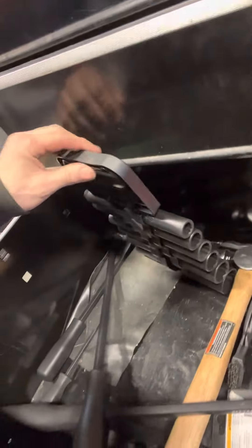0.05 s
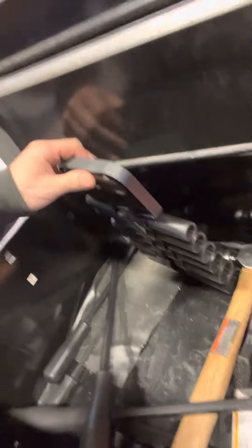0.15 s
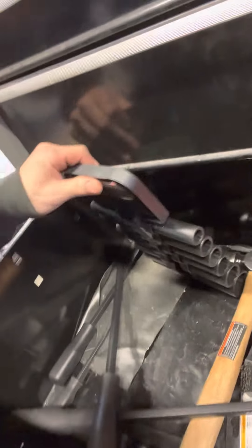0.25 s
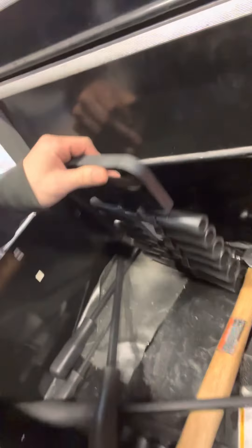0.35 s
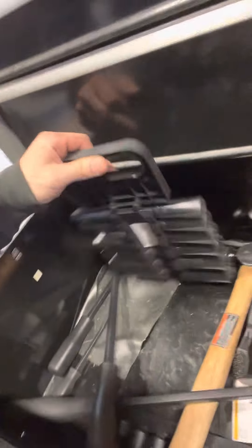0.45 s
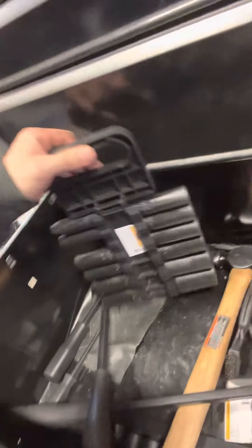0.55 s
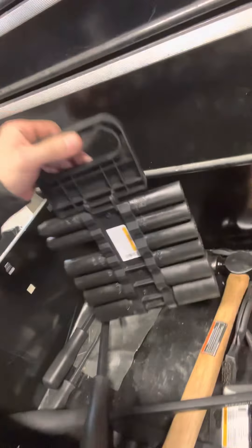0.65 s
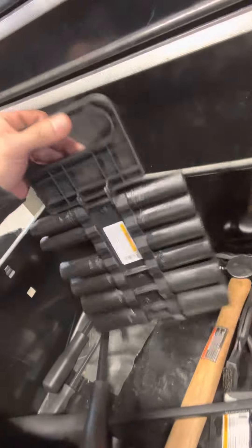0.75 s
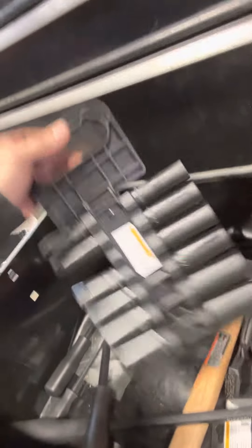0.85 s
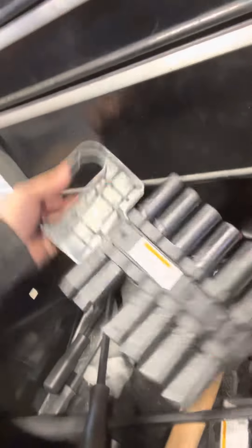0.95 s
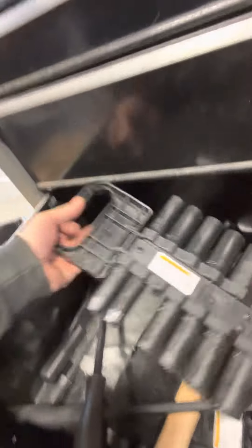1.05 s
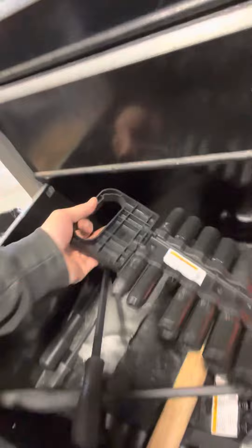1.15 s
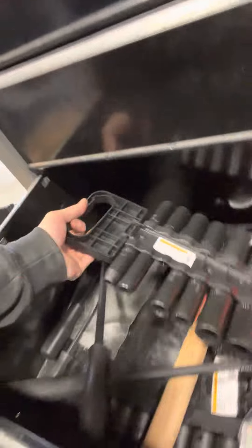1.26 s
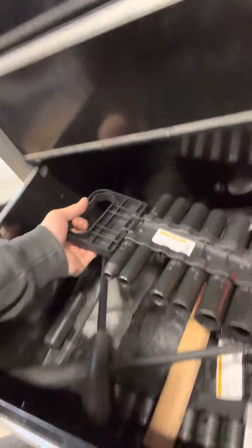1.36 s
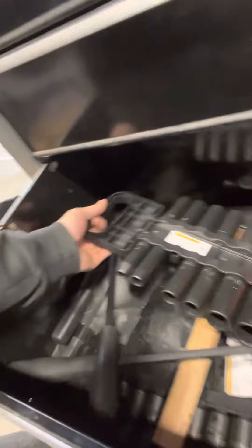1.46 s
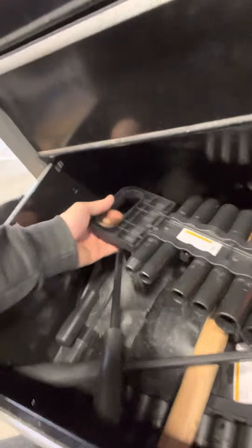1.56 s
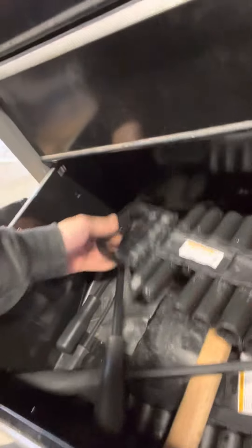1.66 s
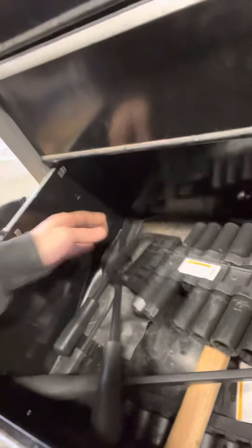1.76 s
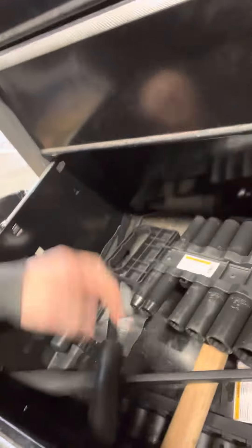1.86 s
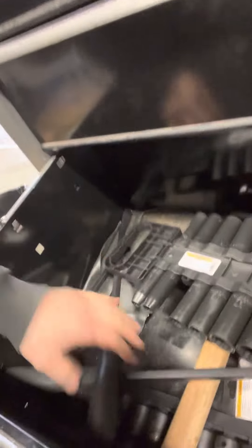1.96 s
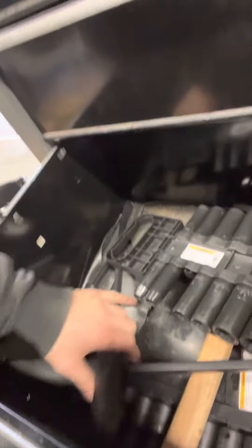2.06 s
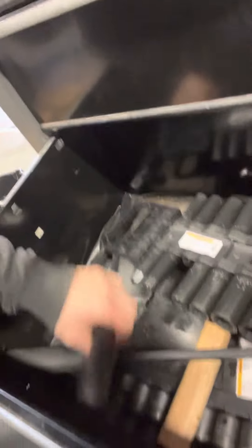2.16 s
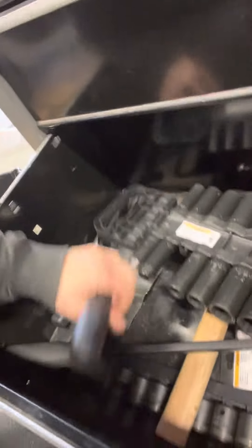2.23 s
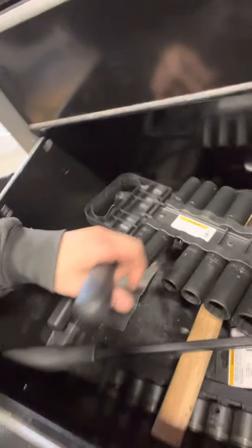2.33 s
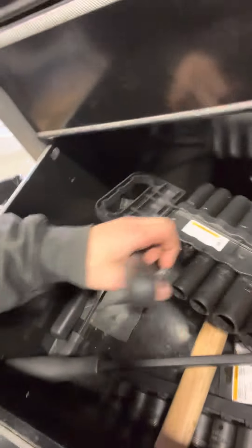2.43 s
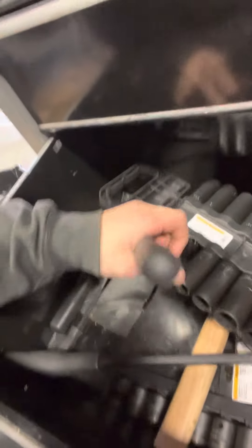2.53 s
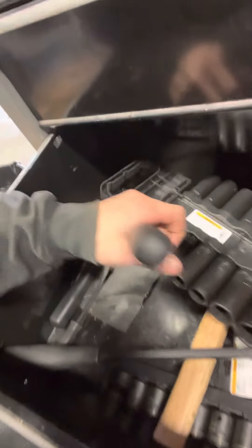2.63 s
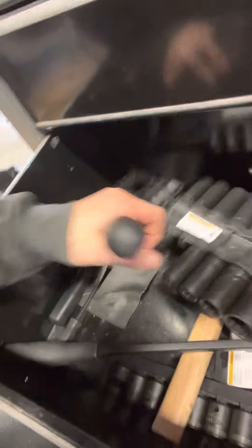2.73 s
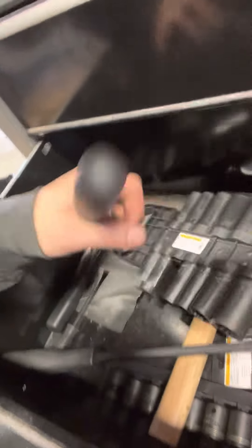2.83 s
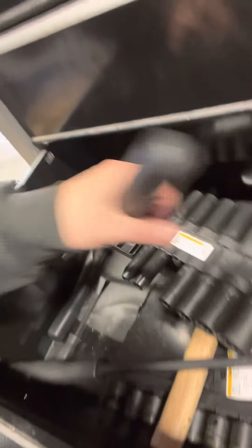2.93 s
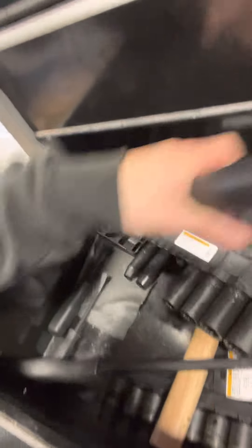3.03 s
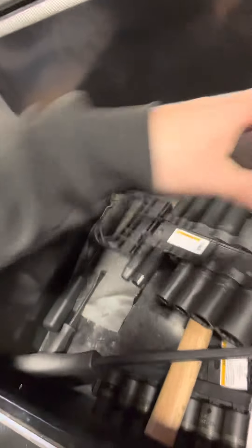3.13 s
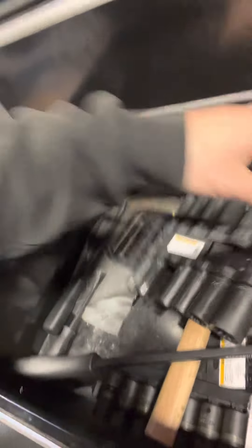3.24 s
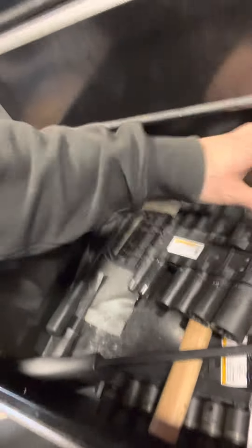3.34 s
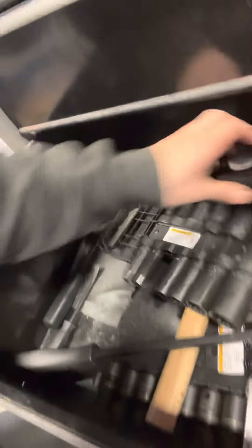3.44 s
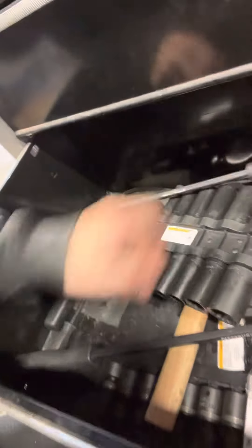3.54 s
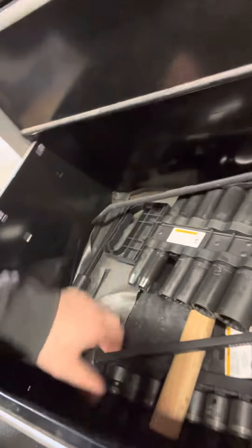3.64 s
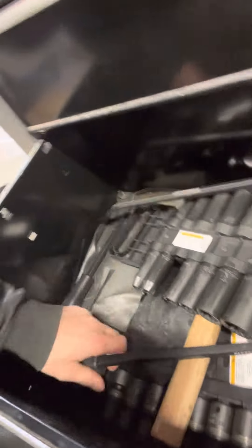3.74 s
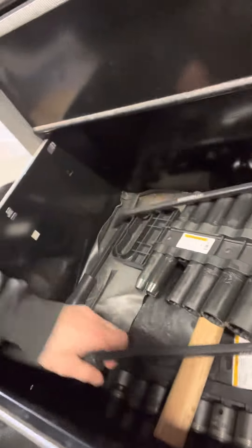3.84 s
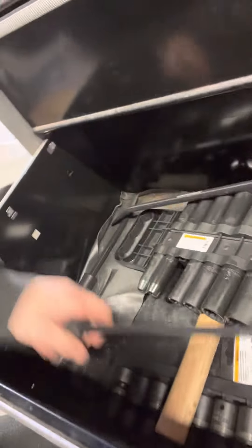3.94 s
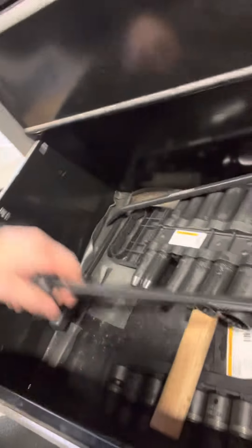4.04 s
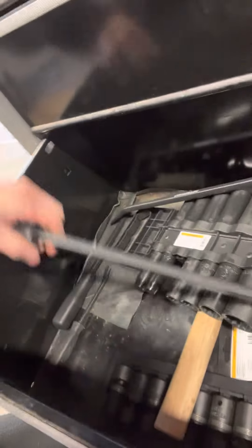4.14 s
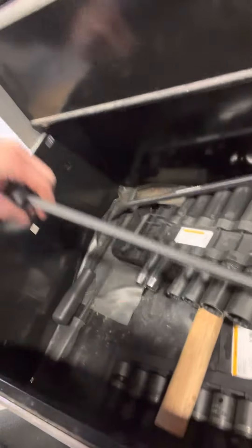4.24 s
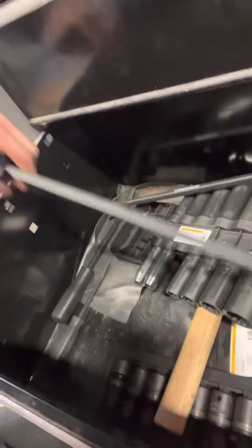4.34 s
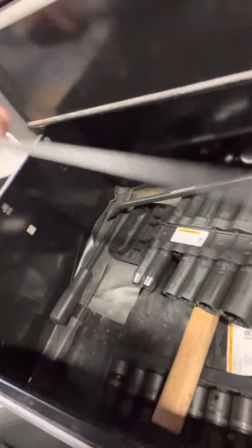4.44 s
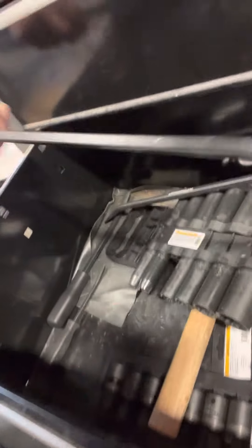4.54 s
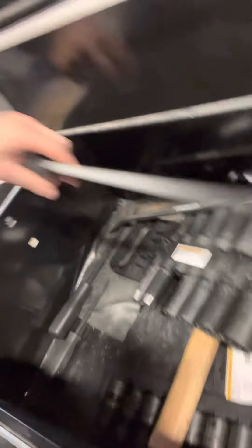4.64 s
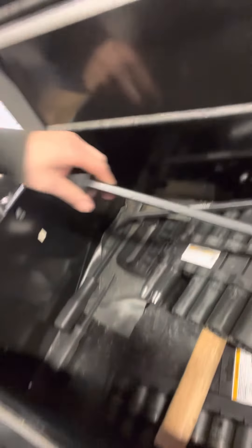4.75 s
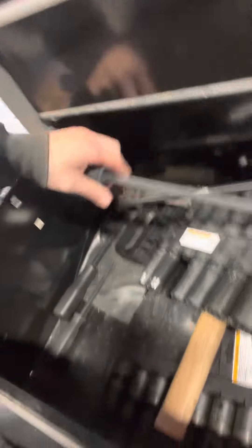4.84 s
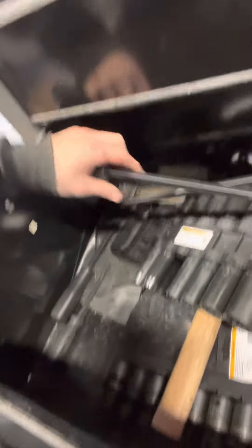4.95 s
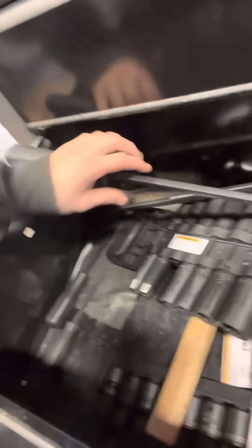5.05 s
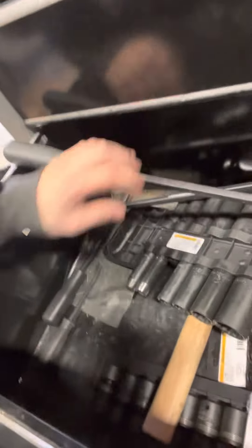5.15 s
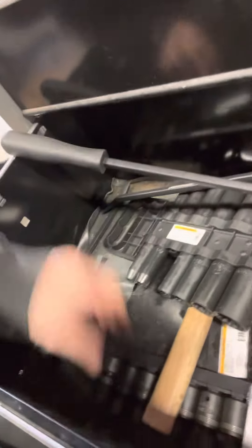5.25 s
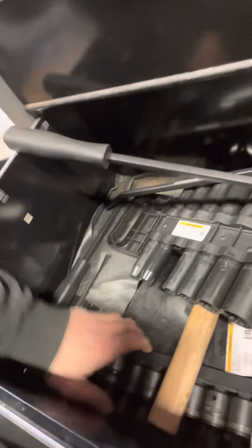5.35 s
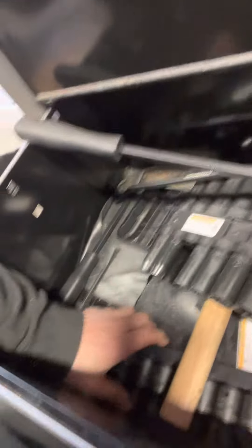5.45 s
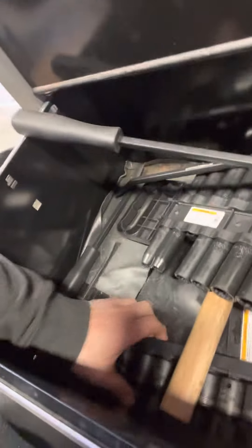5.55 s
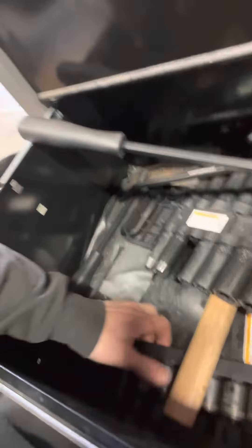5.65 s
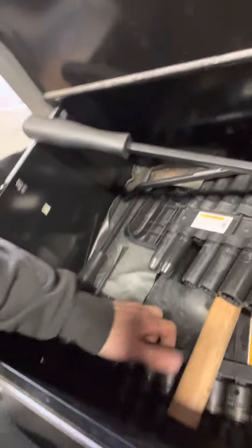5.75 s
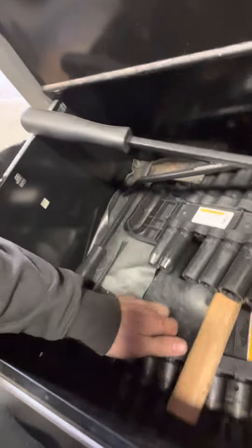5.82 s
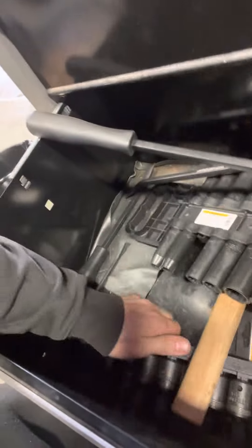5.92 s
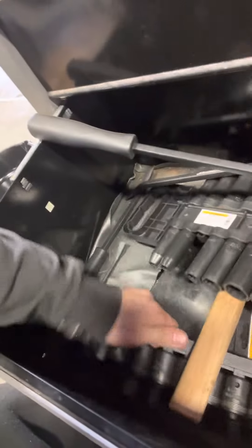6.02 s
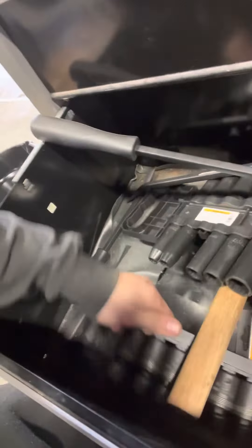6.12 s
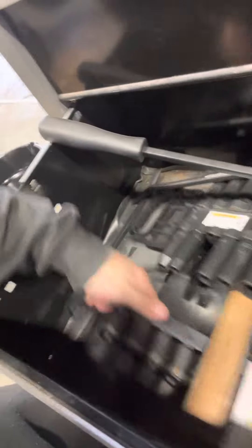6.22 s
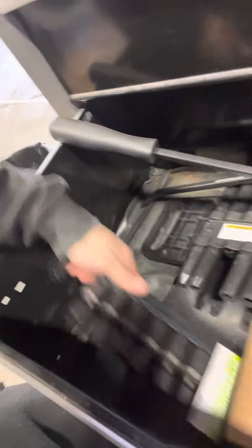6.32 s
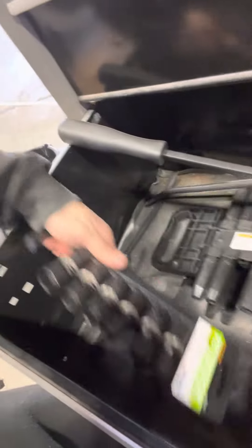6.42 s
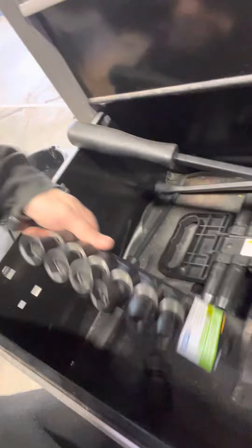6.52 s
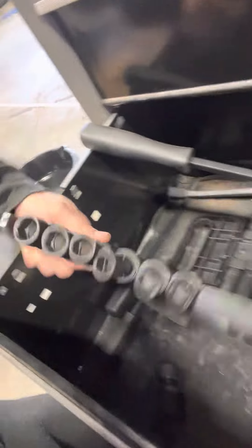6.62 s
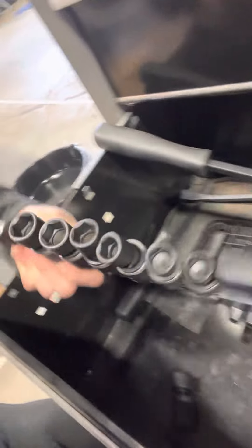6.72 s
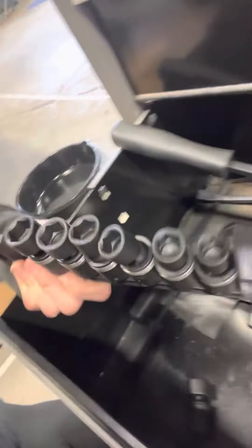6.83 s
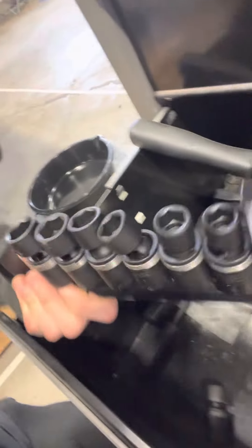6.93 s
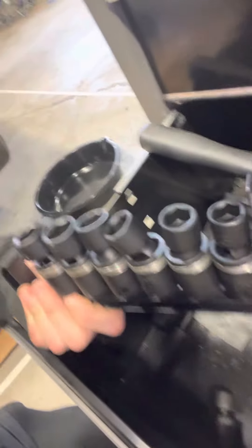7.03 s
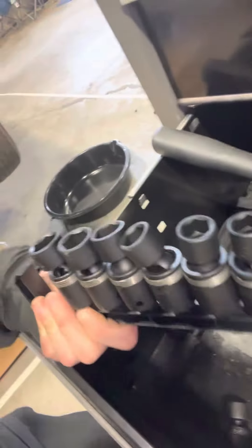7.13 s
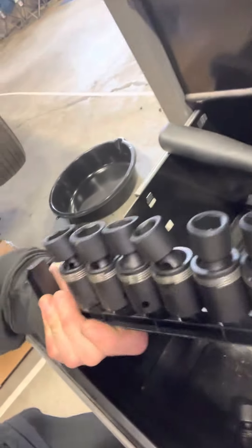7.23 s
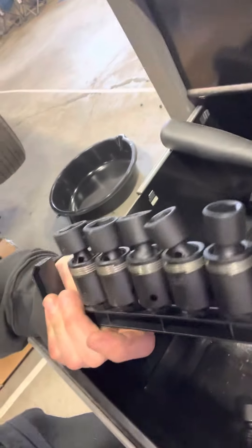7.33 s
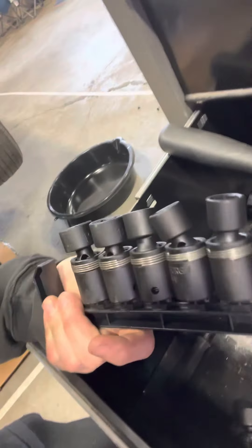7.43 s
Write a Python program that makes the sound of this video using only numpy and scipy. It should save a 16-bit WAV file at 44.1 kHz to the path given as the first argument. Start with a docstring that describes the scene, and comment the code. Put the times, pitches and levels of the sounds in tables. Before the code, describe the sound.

Hard irregular contacts inside a sheet-metal drawer: steel-on-steel clicks, hollow plastic-like clacks and low thuds, with short high socket rings and brief gritty scrapes. Activity comes in clusters separated by near-quiet, strongest just after six seconds. The box gives a short boxy reflection, the garage a longer diffuse tail, over faint air; microphones very close.

```python
"""Rummaging in a steel tool chest

A hand lifts and sets down a socket holder, a mallet, a pry bar and a socket rail in a garage.
Contacts are bursts of noise: click, clack and sheet-metal thud. Loose steel rings as decaying sines.
Slides are gritty filtered noise, soft nudges are muffled contacts, and the floor hums near the end.
Noise tails make the echoes of chest and garage, over faint air; two close microphone ports listen."""
import sys
import numpy as np
from scipy import signal
from scipy.fft import rfft, irfft, next_fast_len
from scipy.io import wavfile
from scipy.ndimage import uniform_filter1d, minimum_filter1d, map_coordinates

SR = 44100
rng = np.random.default_rng(int(sys.argv[2]) if len(sys.argv) > 2 else 0)


def master(y):
    """Save y as 16-bit WAV."""
    cut = np.clip(np.atleast_2d(y).T, -1, 1)
    pcm = np.round(cut * 32767)  # scale
    wavfile.write(sys.argv[1], SR, pcm.astype(np.int16))


N = 329868


def amp(db):
    """Amplitude factor of a level in dB."""
    return 10 ** (np.asarray(db) / 20)


def unit(x):
    """x scaled to rms 1."""
    return x / np.sqrt(np.mean(x ** 2) + 1e-20)


def along(points, hz):
    """(Hz, value) points interpolated on a log frequency axis."""
    point_hz, values = np.transpose(points)
    return np.interp(np.log(hz + 1), np.log(point_hz + 1), values)


def fade(t, t60_s):
    """Free decay, 60 dB in t60_s."""
    return np.exp(-np.log(1000) * t / np.maximum(t60_s, 1e-3))


def swell(t, attack_s):
    """A sound takes a moment to build up."""
    return 1 - np.exp(-t / attack_s)


def wobble(knots, size):
    """A smooth random curve of rms 1, size points through about that many knots."""
    values = rng.standard_normal(int(knots) + 4)
    return unit(map_coordinates(values, [np.linspace(0, knots, size)]))


def filtered(x, response):
    """x times a complex response of frequency."""
    size = x.shape[-1]
    padded = next_fast_len(size + 4096)
    hz = np.fft.rfftfreq(padded, 1 / SR)
    return irfft(rfft(x, padded) * response(hz), padded)[..., :size]


def add(track, start_s, x):
    """Mix x into the track at start_s."""
    part = track[..., max(round(start_s * SR), 0):][..., :x.shape[-1]]
    part += x[..., :part.shape[-1]]


# Stereo likeness of noise. Each row: frequency in Hz, left-right correlation from 0 to 1.
LIKENESS = [(120, 1), (350, 1), (700, 0.4), (1700, 0.89), (2600, .55), (3500, 0.78), (6000, 0.38),
            (8000, 0.98), (9300, 1), (13000, 1)]


def noise(size, response):
    """Coloured noise, rms 1 per port; row 0 reaches both ports alike, row 1 with opposite signs."""
    def colour(hz):
        turn = np.arccos(np.clip(along(LIKENESS, hz), 0, 1)) / 2
        return response(hz) * np.array([np.cos(turn), np.sin(turn)])
    return unit(filtered(rng.standard_normal((2, size)), colour)) / np.sqrt(2)


# Colour of the air. Each row: frequency in Hz, relative level in dB.
AIR_COLOUR = [(25, -13.5), (70, -1.5), (140, -14), (240, -17.5), (450, -24), (1500, -28), (3000, -31.5),
              (6000, -46), (12000, -62)]


def air():
    """A faint steady hush: noise, strongest in the bass."""
    return amp(-53.5) * noise(N, lambda hz: amp(along(AIR_COLOUR, hz)))


def burst(envelope, response):
    """A dense cluster of modes of even strength that carries the energy of its envelope."""
    modes = noise(len(envelope), response)
    power = uniform_filter1d((modes ** 2).sum(0), size=600)
    x = modes / np.sqrt(np.abs(power) + 1e-6) * envelope
    return x * np.linalg.norm(envelope) / np.linalg.norm(x)


def chatter(t, t60_s, crack_db, attack_s, rebounds_per_s, depth_db):
    """A first crack, then a decay broken up by tiny rebounds of hard parts."""
    rebounds = fade(t, t60_s) * amp(depth_db * wobble(rebounds_per_s * t[-1], len(t)))
    crack = amp(crack_db) * fade(t, 0.0088)
    shape = (rebounds + crack) * swell(t, attack_s)
    return shape * np.linalg.norm(fade(t, t60_s)) / np.linalg.norm(shape)


SETTLE_S = 0.016  # a tool lands on one end, then its other end comes down


def settling(t, envelope, again_db):
    """The envelope with a weaker second landing; the two share its energy."""
    second = amp(again_db) * np.interp(t - SETTLE_S, t, envelope, left=0)
    both = np.hypot(envelope, second)
    return both * np.linalg.norm(envelope) / np.linalg.norm(both)


def tool(spectrum, spacing_hz, depth_db):
    """Each contact picks its own resonances out of the general colour."""
    return lambda hz: amp(along(spectrum, hz) + depth_db * wobble(hz[-1] / spacing_hz, len(hz)))


# Resonances of the chest floor. Each row: centre in Hz, width in Hz, relative level in dB.
FLOOR_MODES = [(55, 36, -16), (101.4, 35, -6), (183.3, 31.4, -4), (238.6, 41.1, 3), (280.3, 58.3, -2),
               (377.6, 120, -8.5), (424.5, 33.8, -5.5), (495, 26, -8.5)]


def sheet(hz):
    """Sheet-metal modes with alternating signs, rolled off above 650 Hz."""
    total = 0
    for k, (centre_hz, width_hz, db) in enumerate(FLOOR_MODES):
        damping = 1j * hz * width_hz
        total = total + (-1) ** k * amp(db) * damping / (centre_hz ** 2 - hz ** 2 + damping)
    return total / np.sqrt(1 + (hz / 650) ** 6)


# Colour of holders and handles. Each row: frequency in Hz, relative level in dB.
CLACK_COLOUR = [(200, -45), (550, -3), (700, -8), (860, 2.5), (1100, -3), (1500, -7.5), (2100, -12),
                (3000, -17), (6000, -59.5)]
# Colour of steel on steel. Each row: frequency in Hz, relative level in dB.
CLICK_COLOUR = [(600, -41), (1700, 2), (2400, -0.5), (2900, -2), (3800, 1), (5000, -4.5), (7000, -5),
                (9000, -13.5), (12000, -17), (16000, -17)]
# Blows near the middle of the floor drive its lowest modes more. Each row: time in seconds, bass in dB.
MIDDLE_BASS = [(.5, -7.5), (1.2, -2.5), (2.8, -1.5), (3.5, -0.5), (4, -2), (4.9, -1.5), (5.6, -2.5),
               (6.3, -0.5)]
THUD_DB, CLACK_DB, CLICK_DB = -0.17, -0.31, -0.63  # at hardness 0 dB
CLATTER_T60_S = 0.073  # click at strength -23 dB, hardness 0, edge 0; halves for each of these steps:
HARDER_DB, LIGHTER_DB, SHARPER_DB_PER_OCTAVE = 16, 38.5, 25


def contact(at_s, db, hardness_db, edge_db):
    """Steel clicks, holders clack, the floor thuds; hard, light, sharp contacts clatter shortest."""
    t = np.arange(SR // 3) / SR
    halvings = hardness_db / HARDER_DB - (db + 23) / LIGHTER_DB + edge_db / SHARPER_DB_PER_OCTAVE
    t60_s = CLATTER_T60_S * 2 ** -halvings
    bass_db = np.interp(at_s, *np.transpose(MIDDLE_BASS))

    thump = settling(t, fade(t, 0.24) * swell(t, 0.0093), again_db=-9.5)
    thud = burst(thump, lambda hz: sheet(hz) * amp(bass_db / (1 + (hz / 170) ** 4)))

    crack_db = 10 - 130 * t60_s  # a clean blow is nearly all crack, a loose clatter has hardly any
    rattle = chatter(t, 1.583 * t60_s, crack_db - 0.5, attack_s=0.0017, rebounds_per_s=220, depth_db=2.5)
    clack = burst(settling(t, rattle, again_db=-8), tool(CLACK_COLOUR, spacing_hz=87.4, depth_db=3.5))

    tick = chatter(t, t60_s, crack_db, attack_s=0.00095, rebounds_per_s=140, depth_db=1.0)
    click = burst(tick, tool(CLICK_COLOUR, spacing_hz=159.9, depth_db=3))
    # sharper edge, more treble
    click = filtered(click, lambda hz: amp(edge_db * np.log2(np.clip(hz, 2500, 13000) / 4100)))

    low = amp(THUD_DB - hardness_db / 2) * thud
    high = amp(CLICK_DB + hardness_db / 2) * click
    return amp(db) * (low + amp(CLACK_DB) * clack + high)


# A tool meets the chest or another tool. Each row: start in seconds, strength in dB,
# hardness (click over thud) in dB, edge (treble slope) in dB per octave.
TOOL_KNOCKS = [(0.051, -33.5, -15.5, -3.5), (0.182, -42.5, 3, 6.5), (0.281, -50.5, 5.5, 6.5),
               (0.341, -41, -11, -4.5), (0.444, -48, -0.5, -6), (.496, -13, -6, -7.5), (.525, -21, -27, 1),
               (0.61, -21.5, -15, -2.5), (0.959, -23, -0.5, 4), (1.081, -13, 12, -3.5),
               (1.133, -18, -10.5, 1), (1.161, -13.5, 0.5, 7), (1.182, -18, -12.5, -5),
               (1.399, -18.5, -16, 2.5), (1.417, -20.5, 2, 5.5), (1.729, -16.5, 14, -.5),
               (1.833, -29, -13, 0), (1.906, -31, -13, -0.5), (1.935, -33, -20, 3.5),
               (2.088, -27, -15, 2.5), (2.19, -38, -31, -3.5), (2.286, -37.5, 8, -2.5),
               (2.36, -28.5, -10, -7), (2.394, -36.5, 13, 4.5), (2.43, -30.5, 6, -1),
               (2.758, -27.5, 3.5, -5.5), (2.786, -25, 6, -4.5), (2.804, -12.5, -5, 1.5),
               (2.839, -15, 12, 0.5), (2.869, -22.5, -22.5, -1.5), (2.951, -31.5, -21, 6.5),
               (3.153, -37.5, 3, -6.5), (3.21, -35, 2, -9), (3.243, -31, -18, 4.5), (3.39, -17.5, 29, -5),
               (3.407, -15, 8.5, 2.5), (3.42, -10.5, -0.5, 0), (3.449, -10.5, -4, 0), (3.599, -15, -8, -1),
               (3.758, -24.5, -16, 3.5), (3.833, -19, -7.5, -2), (3.875, -13, 5, 0), (3.888, -14.5, 3, -7),
               (3.954, -24.5, -19.5, 4.5), (4.803, -29.5, -15, 1), (4.818, -14.5, -8.5, 2),
               (4.889, -15.5, -7, 7), (4.93, -21.5, -12.5, 4), (5.325, -37.5, -25.5, 10),
               (5.525, -35, -7, -0.5), (5.574, -19, 4.5, 4), (5.584, -18, 1, -5.5), (5.701, -36.5, -1, 8),
               (5.82, -43, -3.5, 7.5), (5.852, -38, -11.5, -2.5), (5.907, -43.5, -22, 15),
               (5.965, -34, -8, 5.5), (6.062, -3.5, -6.5, 7.5), (6.185, -19.5, -6, 1),
               (6.236, -15, -12.5, 1), (6.285, -14, -14.5, -1), (6.373, -11.5, 0, 3.5),
               (6.39, -15, 0, -4.5), (6.435, -14.5, -21, 2), (6.454, -15, 12, -1.5),
               (6.474, -14.5, 0.5, 4.5), (6.5, -14, -16, 2), (6.563, -25, 9.5, .5),
               (6.618, -26, -5.5, -1.5)]


def knocks():
    """Tools are lifted, bumped and set down, one contact each."""
    out = np.zeros((2, N))
    for start_s, db, hardness_db, edge_db in TOOL_KNOCKS:
        add(out, start_s, contact(start_s, db, hardness_db, edge_db))
    return out


def echo(x, decay, size):
    """A diffuse unit-gain tail, new every half second; each frequency dies at its own speed."""
    out, step = np.zeros((2, N)), SR // 2
    for first in range(0, N, step):
        hz, t, z = signal.stft(noise(size, np.ones_like), SR, nperseg=256)
        shape = fade(t, along(decay, hz)[:, None]) * swell(t, 0.0029)
        shape /= np.sqrt(np.mean(shape ** 2, axis=1, keepdims=True) * size)
        tail = signal.istft(z * shape, SR, nperseg=256)[1]
        add(out, first / SR, signal.fftconvolve(x[None, first:first + step], tail, axes=1))
    return out


# Decay in the chest. Each row: frequency in Hz, t60 in seconds.
CHEST_T60 = [(100, 1), (1000, 0.25), (5000, 0.14), (15000, 0.16)]


def chest_echo(direct, steel):
    """The steel box answers with a short diffuse tail."""
    return amp(-10.5) * echo(direct + amp(-16.5) * steel, CHEST_T60, size=SR // 2)


# Decay in the garage. Each row: frequency in Hz, t60 in seconds.
GARAGE_T60 = [(100, 2.8), (300, 1.04), (1000, 2.36), (2500, 2.42), (4500, 1.12), (7000, 1.2), (12000, 1.4)]
# Sound sent into the garage. Each row: frequency in Hz, level in dB.
GARAGE_LEVEL = [(60, -15), (150, -12), (240, -15), (400, -14.5), (900, -19.5), (2500, -14.5), (4000, -21),
                (6000, -22.5), (12000, -29)]


def garage_echo(direct, steel):
    """The room answers with a long diffuse tail, coloured by what reaches it."""
    sent = filtered(direct + amp(-9.5) * steel, lambda hz: amp(along(GARAGE_LEVEL, hz)))
    return echo(sent, GARAGE_T60, size=2 * SR)


def ring(t, hz, t60_s):
    """One struck mode: a sine that decays freely."""
    return np.sin(2 * np.pi * hz * t) * fade(t, t60_s) * swell(t, 0.00027)


# The two modes of a loose socket, lower and upper, in Hz.
SOCKET_MODES_HZ = [7849, 9369]
# That socket is struck. Each row: start in seconds, lower mode in dB, upper mode in dB,
# t60 in seconds, seconds it rings free before it is damped.
SOCKET_STRIKES = [(1.163, -12, -10, 0.13, .1), (1.23, -37.5, -72, 1, 0.54), (1.422, -15, -4.5, 0.098, 0.49),
                  (1.866, -21.5, -22, 0.23, 0.042), (2.288, -16, -10, 0.68, 0.078),
                  (3.273, -22.5, -22, 0.1, 0.093), (3.449, -22.5, -49, 0.91, 0.41)]
# Other tools ring on strong modes. Each row: start in seconds, frequency in Hz, level in dB, t60 in seconds.
TOOL_PINGS = [(.959, 704, -19.5, .14), (1.081, 3620, 1, 0.019), (1.081, 4830, -9, 0.027),
              (1.085, 10430, 1, .062), (1.16, 1184, -16.5, .18), (1.161, 10300, -34, .31),
              (1.416, 2400, 4.5, .03), (1.422, 11700, -37, .21), (2.76, 11730, -34, .09),
              (2.784, 8460, -18.5, .045), (2.806, 914, -1, .047), (2.805, 1660, -17, .1),
              (2.839, 3800, -5, .042), (2.837, 8360, -11, .14), (2.839, 10780, -24.5, .1),
              (3.154, 11730, -36.5, .08), (3.243, 863, -22.5, .06), (3.877, 950, -18, .04),
              (3.877, 2450, -8.5, .13), (4.819, 1718, -11.5, 0.061), (5.572, 2360, -16, .13),
              (6.237, 1780, -10, 0.046), (6.375, 3780, -17, .08), (6.535, 3190, -26.5, .24)]


def rings():
    """Steel rings until it dies away or comes to rest against a neighbour."""
    out, t = np.zeros(N), np.arange(SR) / SR
    lower_hz, upper_hz = SOCKET_MODES_HZ
    for start_s, lower_db, upper_db, t60_s, free_s in SOCKET_STRIKES:
        tone = amp(lower_db) * ring(t, lower_hz, t60_s) + amp(upper_db) * ring(t, upper_hz, t60_s)
        damping = fade(np.maximum(t - free_s, 0), 0.021)
        add(out, start_s, tone * damping)
    for start_s, hz, db, t60_s in TOOL_PINGS:
        add(out, start_s, amp(db) * ring(t, hz, t60_s))
    return out


# Tools slide and shuffle under the hand. Each row: start in seconds, end in seconds, level in dB,
# hardness (slope up to 4500 Hz) in dB per octave.
TOOL_SLIDES = [(1.051, 1.13, -39, 2), (1.445, 2.294, -50.5, 4), (2.053, 2.126, -29.5, -3.5),
               (2.586, 2.785, -36.5, 1), (2.637, 2.698, -30, -0.5), (2.695, 2.74, -41, 9.5),
               (2.896, 3.307, -52, -5), (5.7, 6.101, -52, 6)]
# Colour of rubbing before that slope. Each row: frequency in Hz, relative level in dB.
SCRAPE_COLOUR = [(60, -22.5), (250, 13.5), (450, 14.5), (700, 4.5), (1000, 10), (2000, -5), (4000, -9),
                 (7000, -19), (9500, -28.5), (15000, -33.5)]


def slides():
    """Gritty rubbing that swells and fades with each stroke."""
    out = np.zeros((2, N))
    for start_s, end_s, db, hardness in TOOL_SLIDES:
        length_s = end_s - start_s
        size = int(length_s * SR)
        fine_db = 2.5 * wobble(length_s * 400, size)
        coarse_db = 3.6 * wobble(length_s * 35, size)
        grit = unit(amp(fine_db + coarse_db))
        stroke = unit(np.sin(np.linspace(0, np.pi, size)))
        colour = tool(SCRAPE_COLOUR, spacing_hz=111.9, depth_db=5.0)
        rub = noise(size, lambda hz: colour(hz) * amp(hardness * np.log2(np.minimum(hz, 4500) + 1)))
        add(out, start_s, amp(db) * stroke * grit * rub)
    return out


# The hand nudges loose tools. Each row: start in seconds, end in seconds, strength in dB.
HAND_NUDGES = [(1.468, 1.589, -32), (1.969, 2.046, -45.5), (3.001, 3.11, -36.5), (3.501, 3.556, -27.5),
               (3.658, 3.721, -31.5), (3.98, 4.138, -43.5)]
NUDGES_PER_S, NUDGE_SCATTER_DB = 13, 0.5


def nudges():
    """Loose tools bump softly at uneven moments while the hand is among them."""
    out = np.zeros((2, N))
    for start_s, end_s, db in HAND_NUDGES:
        count = max(1, round((end_s - start_s) * NUDGES_PER_S))
        for k, (shift, strength) in enumerate(rng.uniform(-1, 1, (count, 2))):
            at_s = start_s + (end_s - start_s) * (k + 0.5 + shift / 2) / count
            nudge_db = db + NUDGE_SCATTER_DB * strength
            add(out, at_s, contact(at_s, nudge_db, hardness_db=-29, edge_db=7))  # soft, muffled
    return out


def panel(start_s, hz, db):
    """With the socket rail lifted off it, the floor panel hums on freely in one mode."""
    out, t = np.zeros(N), np.arange(2 * SR) / SR
    hum = ring(t, hz, t60_s=2.3) * swell(t, 0.02)
    add(out, start_s, amp(db) * hum)
    return out


def scene():
    """The tools sound directly, inside the chest and round the garage, over a faint hush of air."""
    hush = air()
    direct = knocks() + slides() + nudges()
    steel = rings()
    echoes = chest_echo(direct.sum(0), steel) + garage_echo(direct.sum(0), steel)
    common, apart = direct + echoes + hush
    common = common + steel + panel(start_s=6.5, hz=98.7, db=-25.5)
    return np.array([common + apart, common - apart])


def limiter(x, ceiling):
    """The gain ducks for a few milliseconds around the highest peaks."""
    needed = np.minimum(1, ceiling / (np.abs(x).max(0) + 1e-9))
    return x * uniform_filter1d(minimum_filter1d(needed, size=301), size=301)


# Phase between the ports. Each row: frequency in Hz, lag of left behind right in radians.
PORT_LAG = [(120, 0), (350, .3), (700, .8), (1700, 1.3), (2600, 3), (3400, 5.7), (4700, 5.7), (6000, 5.1),
            (7800, 3.6), (8600, 3.25), (9400, 3.05), (10500, 2.65), (12900, .5)]
LOW_CUT_HZ, TOP_HZ = 45, 15750


def record(dry):
    """Sound reaches the two ports out of step; rumble is cut, peaks are limited and the band ends."""
    def port_response(hz):
        lag = np.exp(0.5j * along(PORT_LAG, hz) * np.array([[-1], [1]]))
        low_cut = (1j * hz) ** 2 / (LOW_CUT_HZ ** 2 - hz ** 2 + 1j * LOW_CUT_HZ * hz)
        return lag * low_cut
    ports = limiter(filtered(dry, port_response), ceiling=0.92)
    return filtered(ports, lambda hz: 1 / np.sqrt(1 + (hz / TOP_HZ) ** 160))


dry = scene()
out = record(dry)
master(out)
```